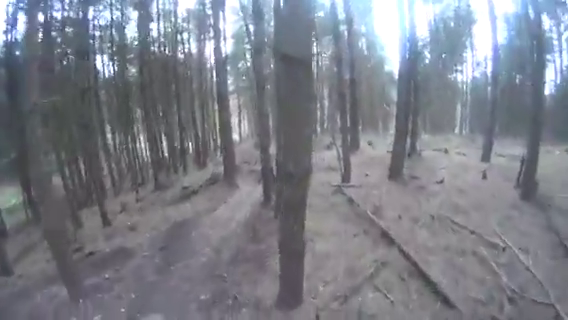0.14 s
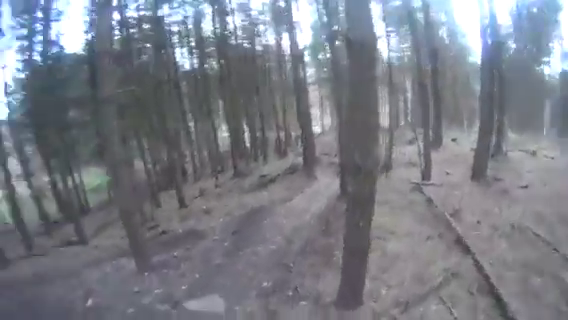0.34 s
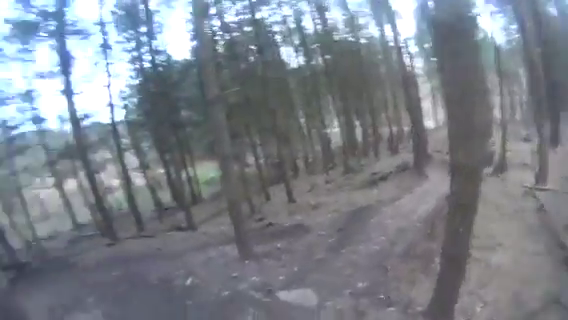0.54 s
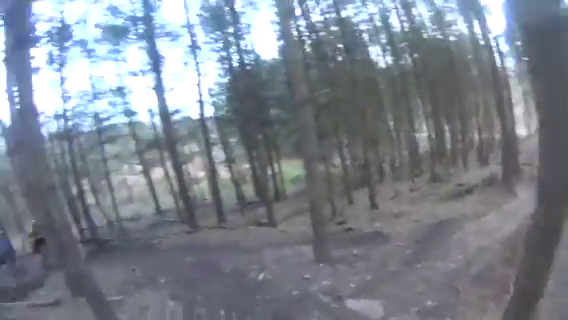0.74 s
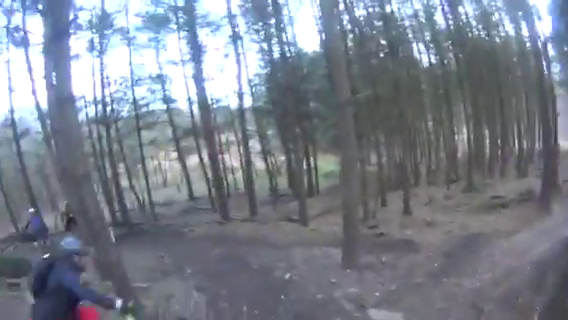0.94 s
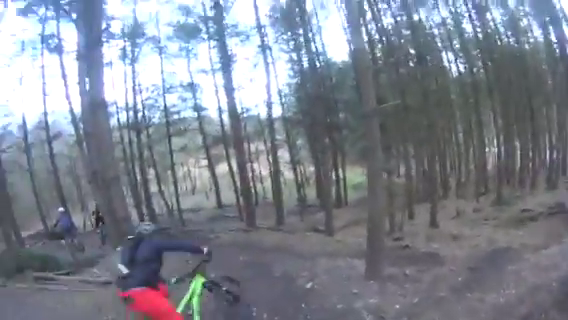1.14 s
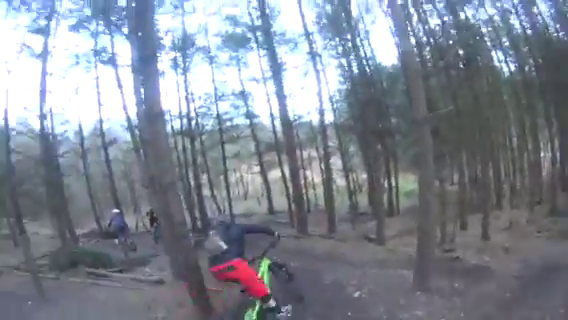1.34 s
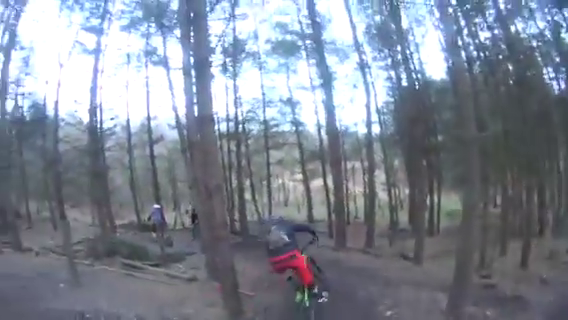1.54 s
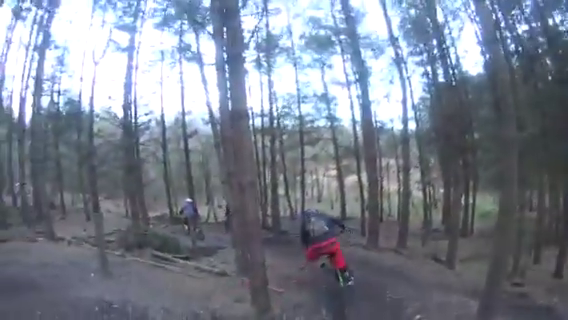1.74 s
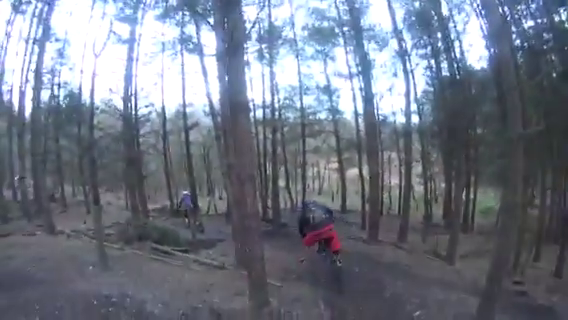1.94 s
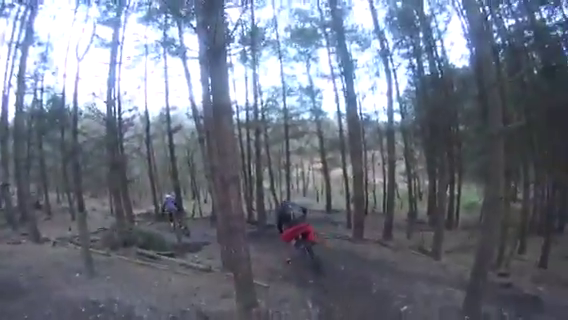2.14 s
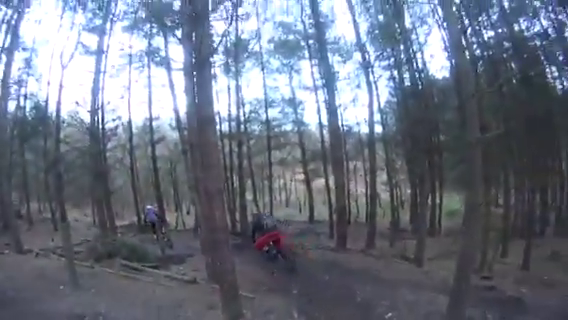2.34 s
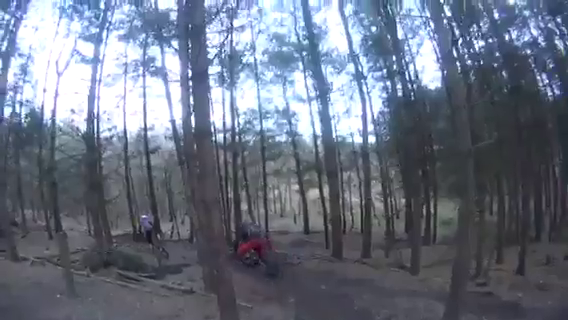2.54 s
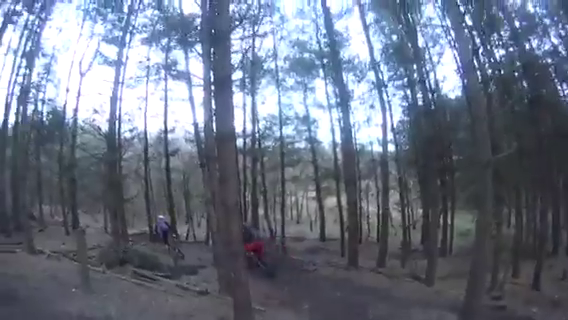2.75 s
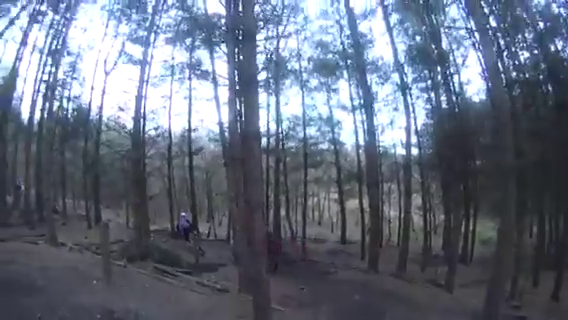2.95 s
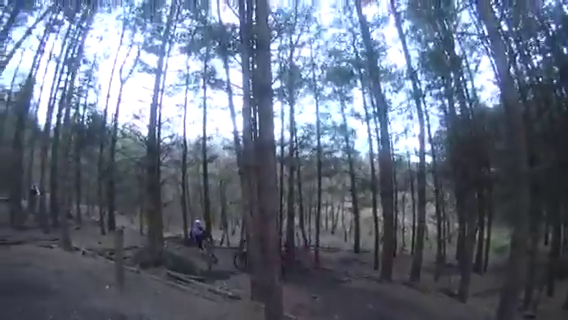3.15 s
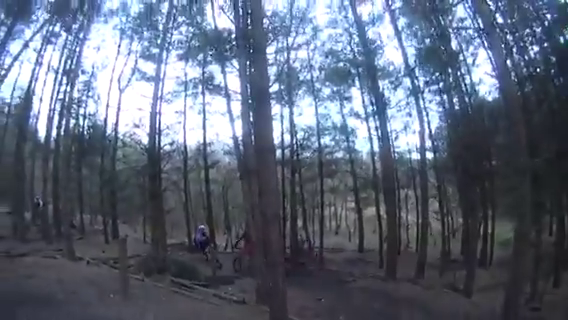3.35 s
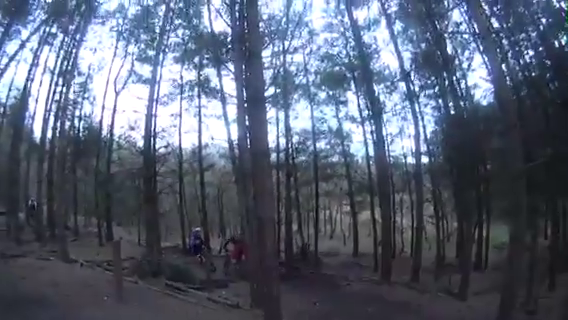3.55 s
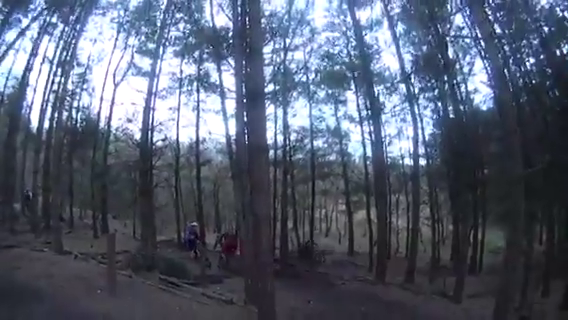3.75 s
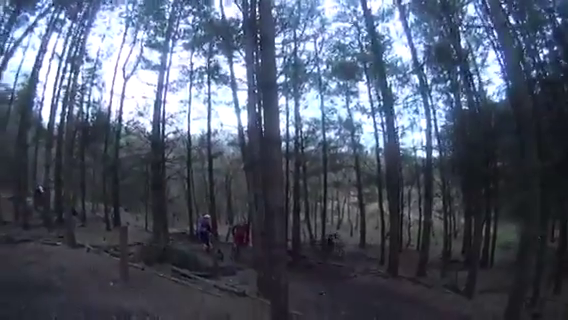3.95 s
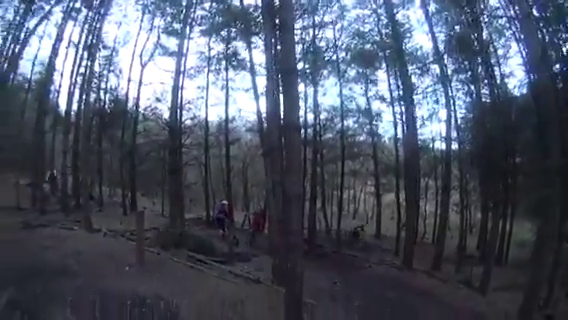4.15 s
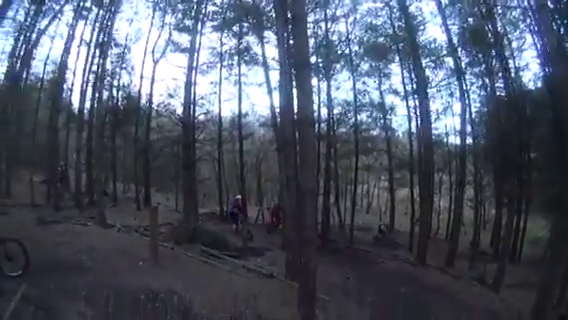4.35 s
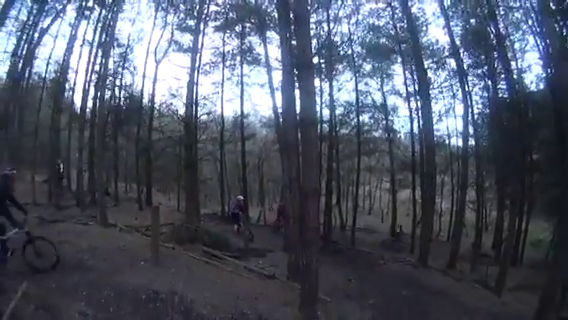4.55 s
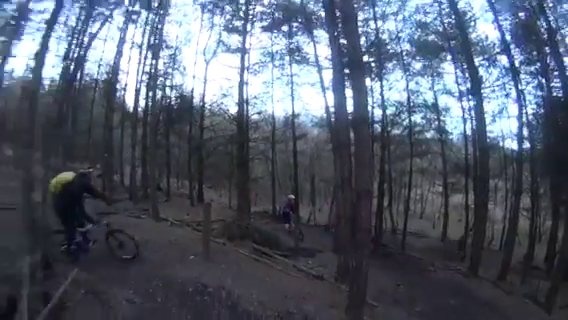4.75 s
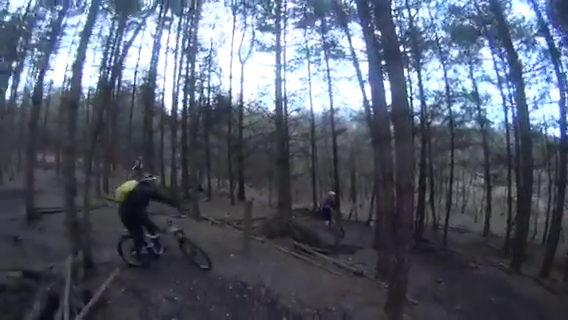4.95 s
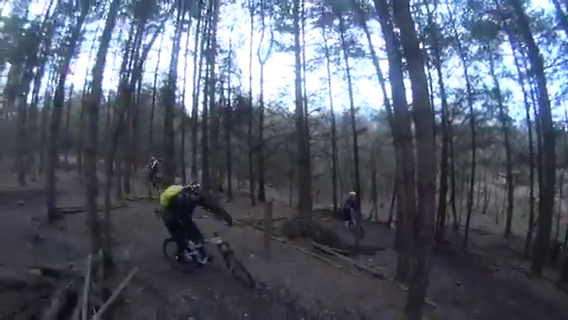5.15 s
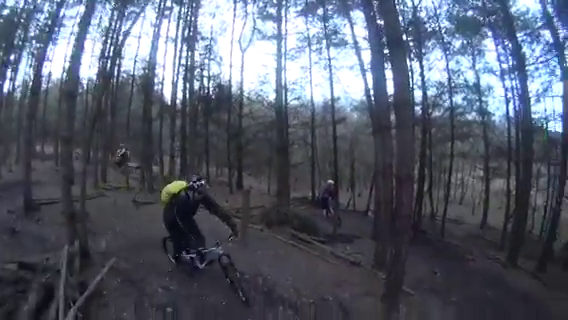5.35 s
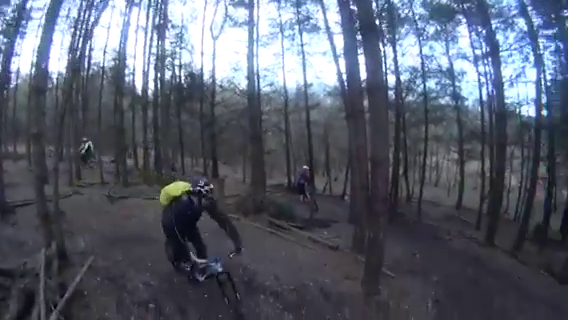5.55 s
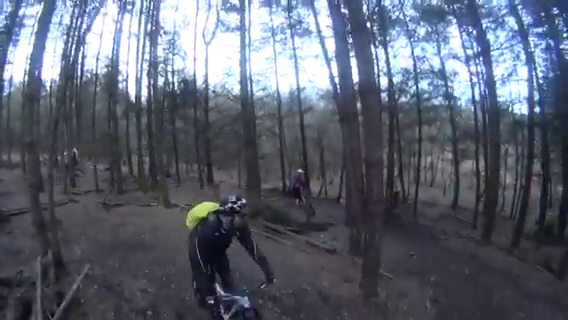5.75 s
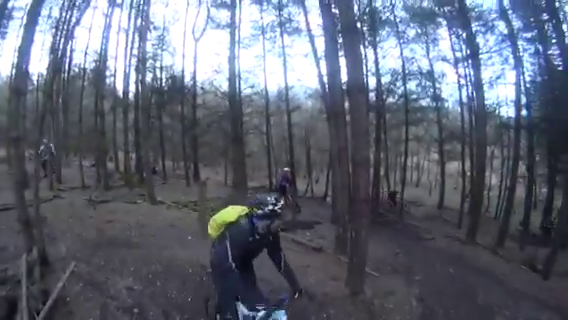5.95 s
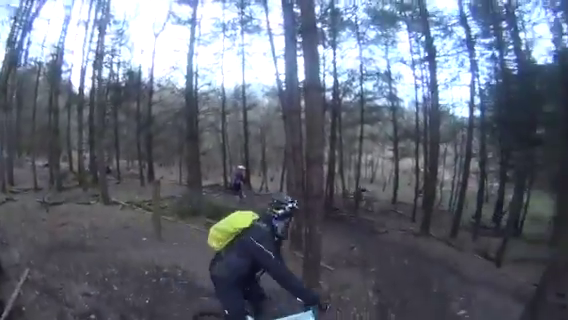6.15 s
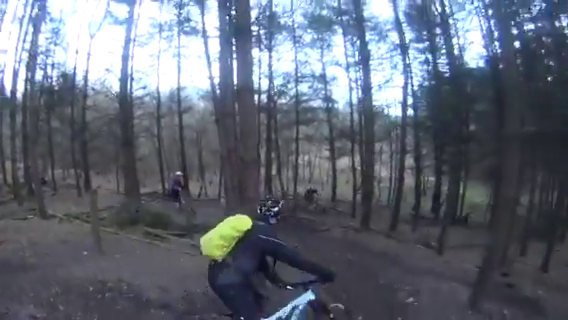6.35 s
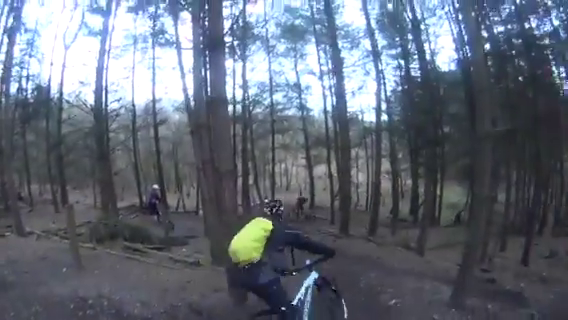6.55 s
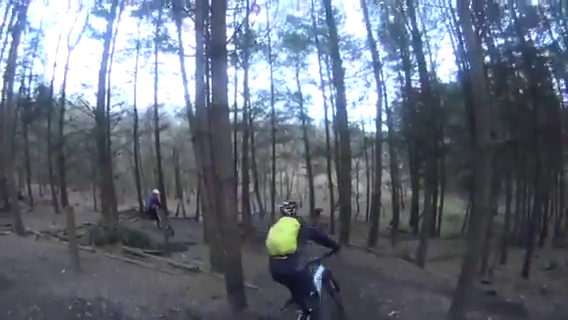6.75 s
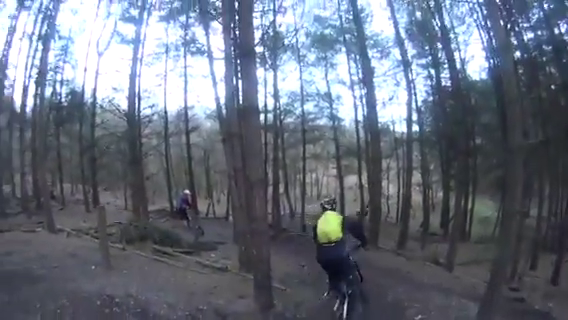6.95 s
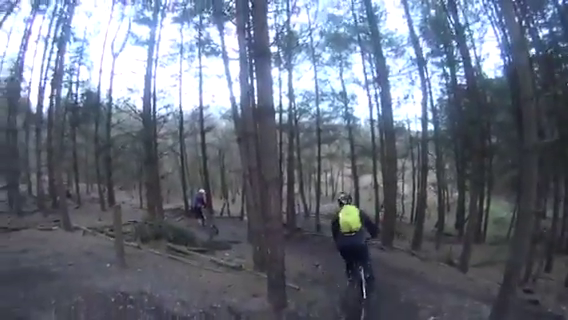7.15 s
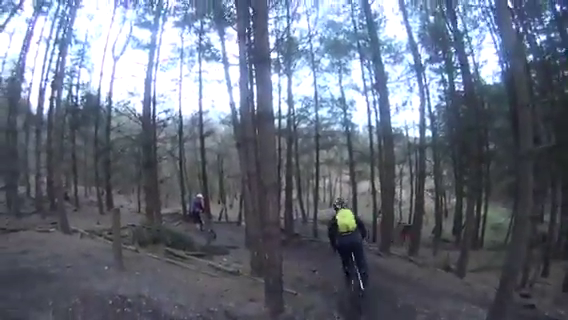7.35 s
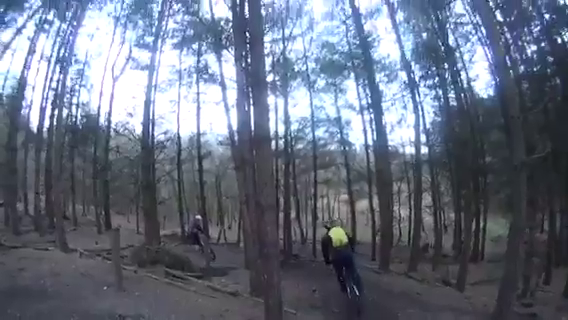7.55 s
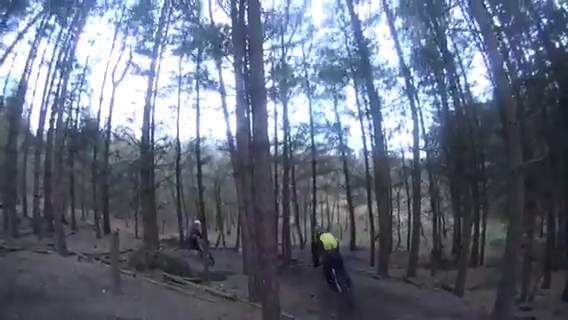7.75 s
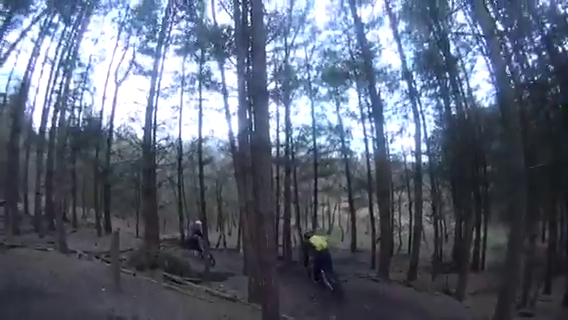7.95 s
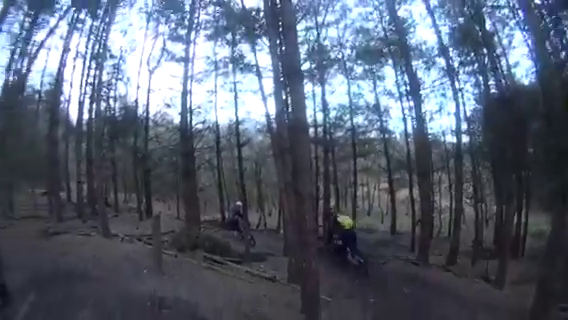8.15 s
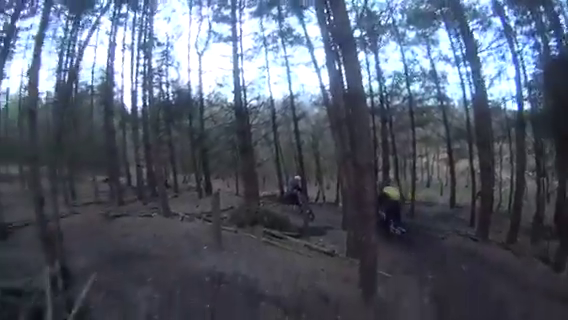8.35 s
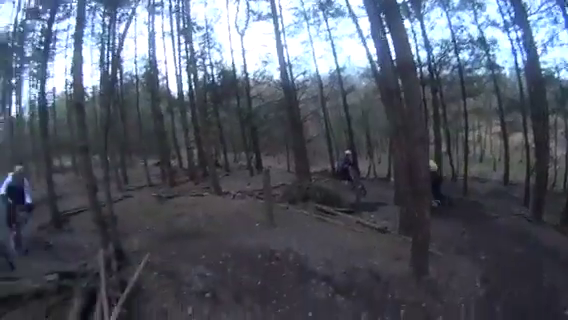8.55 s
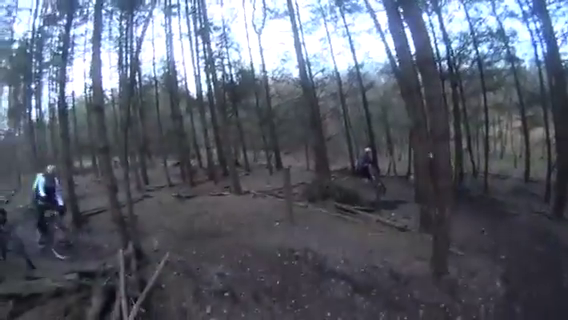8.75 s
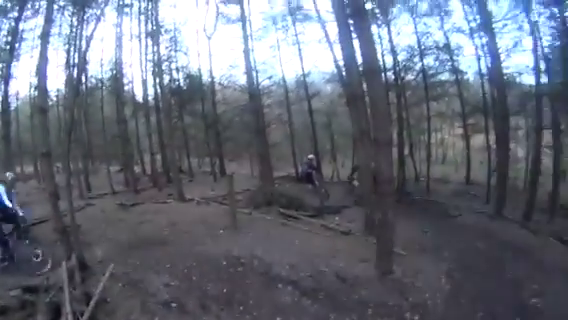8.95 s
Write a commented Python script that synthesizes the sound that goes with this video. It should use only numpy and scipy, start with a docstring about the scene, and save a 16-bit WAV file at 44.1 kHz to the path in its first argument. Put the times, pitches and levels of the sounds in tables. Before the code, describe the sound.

Wind thumps on a helmet camera beside a forest dirt trail as a mountain bike skids loudly through a turn, close on the left, its chain slapping. It whirrs away ahead with tyres crunching on grit. A second bike then coasts by more slowly, its freehub ticking rapidly and its chain knocking over bumps, before fading. Low gusts come and go, and the plastic camera case adds a slight ring.

```python
"""Two mountain bikes on a dirt trail

The bikes pass a helmet camera in a pine wood. The first scrubs loudly through the turn and whirrs
away; the second coasts by with a ticking freehub and a rattling chain. Tyres crunch on grit and
needles. Gusts drum on the plastic camera case, which colours everything."""
import sys
import numpy as np
from scipy import signal
from scipy.fft import rfft, irfft, next_fast_len
from scipy.io import wavfile

SR = 44100
rng = np.random.default_rng(int(sys.argv[2]) if len(sys.argv) > 2 else 0)


def generate_wav(signal):
    """Clip the signal to [-1, 1] and save it as 16-bit WAV at the path in sys.argv[1]."""
    frames = np.transpose(np.atleast_2d(signal))
    scaled = np.clip(frames, -1, 1) * 32767
    pcm = np.round(scaled).astype(np.int16)
    wavfile.write(sys.argv[1], SR, pcm)


N = 396459
T = np.arange(N) / SR

# Each pass: time when nearest in seconds, nearest distance in m, speed in m/s.
FIRST_BIKE = (1.14, 1.24, 8.5)
SECOND_BIKE = (6.14, 1.495, 2.116)


def tyres(first_db=-32, second_db=-40, far_roll_db=-47.5, far_crunch_db=-48.5, far_spray_db=-54.5):
    """Knobs roll on earth, crush grit and spray needles: dense clicks, over a wash of far riders."""
    # Spectra. Each row: frequency in Hz, relative level in dB.
    roll_spectrum = [(300, -17), (600, -16), (850, -11), (1100, -1), (1500, 0.5), (1900, -13),
                     (3000, -38.5)]
    crunch_spectrum = [(900, -21.5), (1900, -13), (2450, 0), (3050, 2), (3700, -7), (6000, -27.5)]
    spray_spectrum = [(2000, -19.5), (3700, 2), (5100, 6.5), (5700, -1.5), (7300, 1), (9000, -3.5),
                      (9700, -16), (10500, -23), (12000, -33)]
    # Bites into loose ground in a bend. Each row: centre in seconds, load in dB, half length in seconds.
    bites = [(0.087, -33.5, 0.5), (2.086, -46, 0.4), (2.61, -44, 0.35), (3.817, -50, .2), (5.84, -40, 0.12),
             (6.6, -39.5, 0.089), (8.375, -43.5, 0.15)]
    passes = [undb(first_db) * nearness(FIRST_BIKE), undb(second_db) * nearness(SECOND_BIKE)]
    load = np.linalg.norm(passes + [swell(*bite) for bite in bites], axis=0)
    shaded = load * head_shade()
    bumps = walk(per_s=45)  # uneven ground loads all three layers together
    roll_gain = np.hypot(load * undb(-3.5), undb(far_roll_db)) * undb(0.83 * bumps)
    crunch_gain = np.hypot(shaded * undb(0.53), undb(far_crunch_db)) * undb(1.33 * bumps)
    spray_gain = np.hypot(shaded * undb(-1.4), undb(far_spray_db)) * undb(2.0 * bumps)
    roll = colour(clicks(per_s=5000, spread_db=2.5), roll_spectrum)
    crunch = colour(clicks(per_s=4000, spread_db=2.0), crunch_spectrum)
    spray = colour(clicks(per_s=9000, spread_db=3.5), spray_spectrum)
    return roll * roll_gain + crunch * crunch_gain + spray * spray_gain


def tyre_scrubs(slip_db=1.5, judder_db=1.9, edge_s=0.004, margin_s=0.02):
    """Side knobs grip and let go in quick uneven slips, grinding stones and shaking the chain."""
    # Each row: start in seconds, length in seconds, level in dB, centre in Hz, width in Hz.
    scrubs = [(0.635, 0.074, -33.5, 2740, 1300), (.726, 0.017, -20, 2390, 800),
              (0.892, 0.018, -22, 1700, 1300), (0.916, .059, -17.5, 2410, 1100),
              (0.981, 0.052, -16.5, 1970, 1400), (1.046, 0.011, -20, 1710, 1300),
              (1.193, 0.041, -27, 1900, 1700), (1.233, 0.022, -23, 3140, 2030),
              (1.482, 0.0087, -29.5, 3550, 1700), (6.327, 0.017, -28, 2040, 1700),
              (6.638, 0.047, -30.5, 3040, 1700), (6.917, 0.016, -30.5, 2950, 1700),
              (7.471, 0.013, -33.5, 2900, 1300)]
    # Each row: frequency in Hz, relative level in dB.
    grind_spectrum = [(300, -1), (750, -9), (1100, 4), (1500, 0), (1900, -13), (2500, -8), (3200, -8.5),
                      (4000, -5), (7000, -3), (10500, -16)]
    slips = clicks(per_s=7000, spread_db=0) * undb(slip_db * np.minimum(walk(per_s=380), 1))
    skid = (colour(slips, grind_spectrum) + chain_chatter()) * undb(judder_db * walk(per_s=78))
    out = np.zeros(N)
    for start, length, db, hz, width_hz in scrubs:
        span = slice(int((start - margin_s) * SR), int((start + length + margin_s) * SR))
        outside_s = np.maximum(np.maximum(start - T[span], T[span] - start - length), 0)
        out[span] += undb(db) * unit(band(skid[span], hz, width_hz)) * np.exp(-outside_s / edge_s)
    return out


def chain_chatter(typical_per_s=260, scatter_db=1.5):
    """The loose chain hammers the frame at uneven intervals."""
    # Each row: frequency in Hz, width in Hz, gain in dB.
    frame_modes = [(1434, 150, 5.5), (1890, 150, -5.5), (2476, 440, 1.5), (3020, 390, -5)]
    gap, strength = rng.standard_normal((8192, 2)).T
    at = (np.cumsum(np.exp(gap / 2)) * SR / typical_per_s).astype(int)
    hits = np.zeros(N)
    hits[at[at < N]] = undb(scatter_db * strength[at < N])
    return unit(ring(hits, frame_modes))


def fast_freehub(blur_hz=420, overtone=1.68, falloff=0.58, steady_db=-49.5, rise_s=0.025, fall_s=0.055):
    """First bike: pawl clicks blur into a whirr as it coasts; a faint steady whirr from the hubs of riders
    further off runs throughout."""
    # Pedals at rest. Each row: start in seconds, end in seconds, level at the nearest point in dB.
    coasts = [(1.07, 2.99, -32), (3.48, 4.05, -33.5)]
    # Each row: frequency in Hz, width in Hz, gain in dB.
    whirr_modes = [(3010, 370, 5), (5130, 170, 2.5), (5980, 1400, 0.5), (8150, 1700, 1.5), (9830, 240, -8)]
    # A thin two-tone whine rises as the bike moves away.
    # Each row: time in seconds, lower pitch in Hz, level in dB.
    whine_track = [(1.9, 4920, -75), (2.42, 5140, -48), (2.6, 5080, -50), (2.78, 5290, -45),
                   (2.92, 5220, -47), (3.0, 5200, -75)]
    coasting = sum(undb(db) * np.clip(np.minimum((T - start) / rise_s, (end - T) / fall_s), 0, 1)
                   for start, end, db in coasts)
    whirr_gain = np.hypot(coasting * nearness(FIRST_BIKE) ** falloff, undb(steady_db) * head_shade())
    whine_hz, whine_db = curves(whine_track)
    phase = 2 * np.pi * np.cumsum(whine_hz) / SR
    whine = walk(blur_hz) * np.sin(phase) + walk(blur_hz * overtone) * np.sin(overtone * phase)
    whirr = unit(ring(clicks(per_s=6000, spread_db=0.5), whirr_modes))
    return whirr * whirr_gain + whine * undb(whine_db)


def slow_freehub(strike_db=15, snap_s=0.0022, tail_db=-12, tail_s=0.005, scatter_db=1.6):
    """Second bike: a pawl drops into each tooth with a strike, a snap and a shiver of hub and spokes."""
    # Each row: time in seconds, clicks per second.
    pawl_rate = [(4.0, 58.5), (4.3, 59.3), (4.55, 48.8), (4.9, 65.5), (5.2, 46), (5.47, 41.5), (5.6, 63.5),
                 (5.76, 73), (6.2, 46.9), (6.33, 52), (6.48, 64), (6.6, 58.3), (6.72, 43), (7.0, 42.8),
                 (7.8, 62.8), (8.0, 63.3), (8.3, 78.5), (8.7, 56.2)]
    # Loudest as the rear wheel goes by. Each row: time in seconds, level in dB.
    pawl_level = [(3.9, -70), (4.1, -50), (4.55, -51.5), (4.9, -43), (6.22, -38), (6.43, -32.5),
                  (7.05, -37.5), (7.35, -43), (8.2, -43), (8.85, -52)]
    # Each row: frequency in Hz, width in Hz, gain in dB.
    pawl_modes = [(3740, 720, -2), (5070, 2100, 4), (6480, 380, 6), (7370, 500, 10.5), (8050, 730, 4.5),
                  (9400, 300, -33)]
    per_s, = curves(pawl_rate)
    level_db, = curves(pawl_level)
    tooth, fraction = np.divmod(np.cumsum(per_s) / SR, 1)
    age_s = fraction / per_s
    strength = undb(scatter_db * rng.standard_normal(2048))[tooth.astype(int)]
    strike = undb(strike_db) * np.diff(tooth, prepend=tooth[0])
    decay = np.exp(-age_s / snap_s) + undb(tail_db) * np.exp(-age_s / tail_s)
    shiver = decay * rng.choice([-1, 1], N)
    ticks = ring(strength * (strike + shiver), pawl_modes)
    return unit(ground_echo(ticks, distance_m(SECOND_BIKE))) * undb(level_db)


def chain_knocks(ring_s=0.0016, typical_db=-17, crack_s=0.0019, rattle_s=0.088, low_cut_hz=1000):
    """The chain slaps the frame: a few cycles of ring, a dry crack, then a brief loose rattle."""
    # Hard knocks over roots. Each row: start in seconds, level in dB, ring frequency in Hz.
    hard_knocks = [(.7372, -11.5, 2600), (1.0535, -13, 1930), (1.2025, -14, 1960), (1.2355, -12.5, 2800),
                   (1.2555, -11.5, 2480), (3.591, -22, 1340), (3.6405, -27, 3680), (3.713, -23.5, 2800),
                   (4.502, -16.5, 2230), (4.709, -20.5, 2720), (4.7395, -18, 2730), (5.7975, -17.5, 2660),
                   (5.894, -18, 3170), (6.024, -15, 3070), (6.054, -19, 2080), (6.33, -16, 1780),
                   (6.348, -11, 2370), (6.423, -19, 3320), (6.551, -13, 3000), (6.6775, -18.5, 3000),
                   (6.792, -22.5, 3000), (7.277, -25.5, 3140), (7.473, -20, 2950), (8.8174, -19, 2950),
                   (8.8196, -20.5, 1320)]
    blows = np.vstack([hard_knocks, chain_taps()])
    size = 8192
    age_s = np.arange(size) / SR
    rattle_gain = undb(-3) * np.exp(-age_s / crack_s) + undb(-18) * np.exp(-age_s / rattle_s)
    out = np.zeros(N + size)
    for start_s, db, hz in blows:
        decay_s = ring_s * undb(0.14 * (db - typical_db))  # heavy blows ring longer
        tube = np.sin(2 * np.pi * hz * age_s) * np.exp(-age_s / decay_s)
        rattle = unit(band(rng.standard_normal(size), hz, width_hz=2600)) * rattle_gain
        at = int(start_s * SR)
        out[at:at + size] += undb(db) * (tube + rattle / 2)
    low_cut = signal.butter(2, low_cut_hz, "high", fs=SR, output="sos")  # thin tubes radiate no bass
    return signal.sosfilt(low_cut, out[:N])


def chain_taps(count=14, from_s=3.5, nearest_db=-24, scatter_db=1.5, falloff=0.36, ring_hz=3060):
    """Rows for light random chain knocks, louder when the second bike is near."""
    start_s = from_s + (T[-1] - from_s) * rng.random(count)
    strength, pitch = rng.standard_normal((count, 2)).T
    near = np.interp(start_s, T, nearness(SECOND_BIKE))
    db = nearest_db + scatter_db * strength + falloff * 20 * np.log10(near)
    return np.column_stack([start_s, db, ring_hz * np.exp(0.12 * pitch)])


def wind(breeze_db=-59):
    """Gusts drum on the case over a rumble of slow air pressure; single eddies thump it."""
    # Each row: centre in seconds, level in dB, half length in seconds.
    gusts = [(.076, -43.5, 0.14), (0.377, -35.5, 0.086), (.618, -42, 0.094), (0.852, -40.5, 0.081),
             (1.2, -46, 0.11), (1.744, -48.5, 0.085), (2.295, -52, .16), (3.099, -47.5, 0.016),
             (3.219, -41, 0.028), (3.673, -49, 0.15), (4.773, -45.5, 0.1), (5.095, -41, 0.1),
             (6.31, -43.3, 0.18), (6.663, -45.5, 0.087), (8.277, -43.5, 0.15), (8.966, -49, 0.054)]
    # Each row: centre in seconds, level in dB, pitch in Hz, half length in seconds.
    eddies = [(0.257, -22.5, 43, 0.0069), (.377, -21.5, 149, 0.012), (.52, -30, 164.4, 0.023),
              (1.128, -25.5, 45, 0.0075), (1.172, -23.5, 65.5, 0.0031), (3.23, -33, 163, 0.012),
              (5.135, -29.5, 161, 0.018)]
    # Each row: time in seconds, relative level in dB.
    rumble_level = [(0, -54), (1.1, -46.5), (1.5, -59.5), (1.95, -50.5), (2.35, -60), (6.8, -61.5),
                    (8.99, -57)]
    # Spectra. Each row: frequency in Hz, relative level in dB.
    drum_spectrum = [(50, -22), (100, -6.5), (135, -3.5), (168, 2), (205, -9.5), (300, -21.5), (450, -26),
                     (690, -12.5), (950, -38)]
    rumble_spectrum = [(15, -3.5), (33, 1.5), (55, -8), (100, -11.5), (250, -22), (600, -27.5), (1500, -53)]
    rumble_db, = curves(rumble_level)
    push = undb(breeze_db) + sum(swell(*gust) for gust in gusts)
    drum = colour(rng.standard_normal(N), drum_spectrum) * push
    rumble = colour(rng.standard_normal(N), rumble_spectrum) * undb(rumble_db + 4)
    out = drum + rumble
    for centre_s, db, hz, half_s in eddies:
        span = np.abs(T - centre_s) < 4 * half_s
        lag_s = T[span] - centre_s
        out[span] += undb(db) * np.exp(-(lag_s / half_s) ** 2) * np.sin(2 * np.pi * hz * lag_s)
    return out


def mic_ports(x, stray_s=0.0092, size=2048):
    """Sound reaches the case's left port first, and both by stray paths that shift as the head turns."""
    # Each row: frequency in Hz, phase lead of the left port in radians.
    left_lead = [(40, 0.091), (150, 0.63), (350, 1.2), (850, 1.75), (1400, 1.5), (2070, 1.4), (2580, 0.67),
                 (2900, 1.42), (5500, 0.23), (10000, 0.4)]
    # Each row: frequency in Hz, gain in dB.
    stray_spectrum = [(40, -15), (160, -17), (350, 0), (700, -2.5), (1200, -4.5), (2500, -8.5), (8000, -9)]
    n_fft = next_fast_len(N + size)
    hz = np.fft.rfftfreq(n_fft, 1 / SR)
    spectrum = rfft(x, n_fft)
    side = irfft(spectrum * 1j * np.tan(over_hz(left_lead, hz) / 2), n_fft)[:N]
    paths = rng.standard_normal((2, size)) * np.exp(-np.arange(size) / SR / stray_s)
    paths /= np.linalg.norm(paths, axis=1, keepdims=True)
    strays = irfft(spectrum * undb(over_hz(stray_spectrum, hz)) * rfft(paths, n_fft), n_fft)[:, :N]
    turn_rad = 2 * np.pi * T + walk(per_s=2.1)
    side += strays[0] * np.cos(turn_rad) + strays[1] * np.sin(turn_rad)
    return np.array([x + side, x - side])


def ground_echo(x, range_m, hub_m=0.35, ear_m=1.7, echo_db=-7):
    """The ground bounce arrives late; its comb slides with distance."""
    extra_m = np.hypot(range_m, ear_m + hub_m) - np.hypot(range_m, ear_m - hub_m)
    return x + undb(echo_db) * np.interp(T - extra_m / 343, T, x)


def head_shade(depth_db=-11, clear_at_s=0.69, ramp_s=0.13):
    """Gain of the treble layers, low until the first bike comes out from behind the head."""
    return undb(depth_db * np.clip((clear_at_s - T) / ramp_s, 0, 1))


def distance_m(bike):
    """Range of a bike passing at steady speed."""
    nearest_s, nearest_m, m_per_s = bike
    return np.hypot(nearest_m, m_per_s * (T - nearest_s))


def nearness(bike):
    """1 at the nearest point, falling as 1 / distance."""
    return bike[1] / distance_m(bike)


def swell(centre_s, db, half_s):
    """Bell-shaped rise and fall of gain."""
    return undb(db) * np.exp(-np.minimum(((T - centre_s) / half_s) ** 2, 20))


def clicks(per_s, spread_db):
    """Random impulses, many small and a few large; rms 1."""
    hit = rng.random(N) < per_s / SR
    strength = undb(spread_db * np.minimum(rng.exponential(size=N), 5))
    return unit(hit * strength * rng.choice([-1, 1], N))


def walk(per_s):
    """Drift between random values; rms 1."""
    steps = rng.standard_normal(4096)
    return unit(np.interp(T * per_s, np.arange(len(steps)), steps))


def colour(x, outline, size=4096):
    """Minimum-phase filter with a (Hz, dB) outline; output rms 1."""
    gain = undb(over_hz(outline, np.fft.rfftfreq(size, 1 / SR)))
    cepstrum = irfft(np.log(gain))
    cepstrum[1:size // 2] *= 2
    cepstrum[size // 2 + 1:] = 0
    impulse = irfft(np.exp(rfft(cepstrum)))
    return unit(signal.oaconvolve(x, impulse)[:len(x)])


def band(x, hz, width_hz):
    """One resonance, gain 1 at its centre."""
    return signal.lfilter(*signal.iirpeak(min(hz, 0.45 * SR), hz / width_hz, fs=SR), x)


def ring(x, modes):
    """A body's resonances in parallel."""
    return sum(undb(db) * band(x, hz, width_hz) for hz, width_hz, db in modes)


def curves(table):
    """Columns of a time table at every sample."""
    times_s, *columns = np.transpose(table)
    return [np.interp(T, times_s, column) for column in columns]


def over_hz(points, at_hz):
    """Interpolate (Hz, value) points over log frequency."""
    hz, value = np.transpose(points)
    return np.interp(np.log(at_hz + 1), np.log(hz), value)


def undb(db):
    """Decibels to gain."""
    return 10 ** (np.asarray(db) / 20)


def unit(x):
    """Scale to rms 1."""
    return x / np.sqrt(np.mean(x ** 2) + 1e-18)


def scene():
    """Both bikes pass on the left and leave ahead, heard through the ringing case with wind on it."""
    # Each row: frequency in Hz, width in Hz, gain in dB.
    case_modes = [(1081, 28, -6.5), (1293, 16, -13), (1328, 28, -8), (1460, 15, -11.5), (1680, 11, -3),
                  (1940, 7.3, -9), (2064, 57, -5), (2247, 29, -1), (2483, 13, -1.5), (2620, 24, -7),
                  (2940, 70, -10.5), (4660, 29, -16), (6599, 18, -16)]
    # Where the bikes are. Each row: time in seconds, left minus right in dB.
    bearing = [(0, 0.5), (.9, 3.5), (1.8, 0.2), (3.5, 2), (6.2, 1.7), (7.1, 0), (8.99, .6)]
    bikes = tyres() + fast_freehub() + slow_freehub() + tyre_scrubs() + chain_knocks()
    cased = undb(-1.5) * (bikes + ring(bikes, case_modes))
    balance_db, = curves(bearing)
    pan = undb(np.array([balance_db, -balance_db]) / 2)
    return mic_ports(cased) * pan + mic_ports(wind())


def record(dry, ceiling=0.57, top_hz=10850):
    """The camera rounds the loudest peaks and cuts the top."""
    rounded = ceiling * np.tanh(dry / ceiling)
    return signal.sosfilt(signal.ellip(10, 0.2, 70, top_hz, fs=SR, output="sos"), rounded)


dry = scene()
out = record(dry)
generate_wav(out)
```